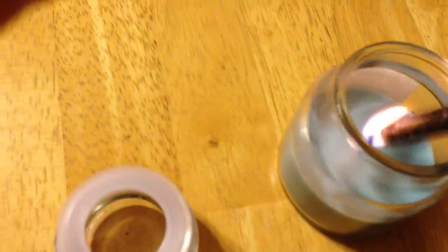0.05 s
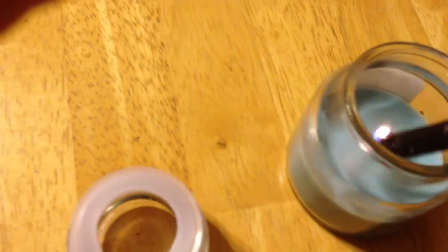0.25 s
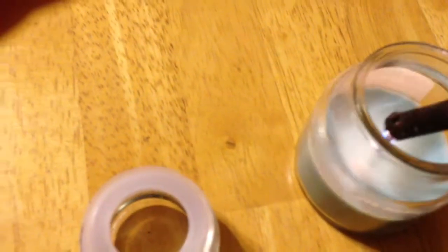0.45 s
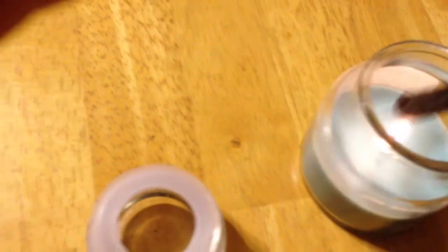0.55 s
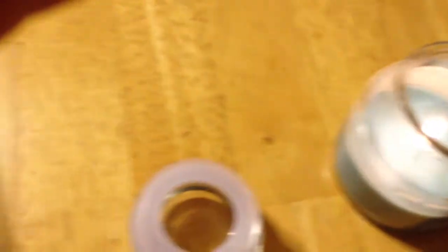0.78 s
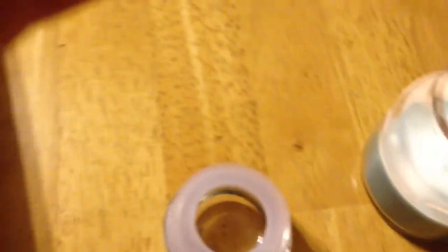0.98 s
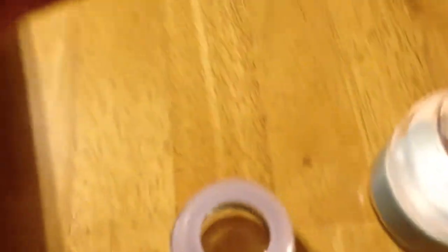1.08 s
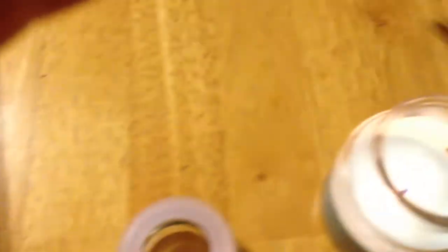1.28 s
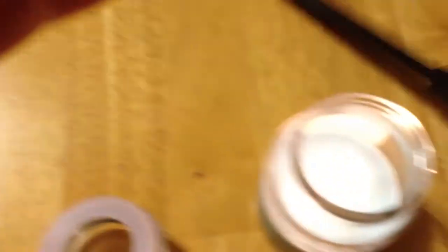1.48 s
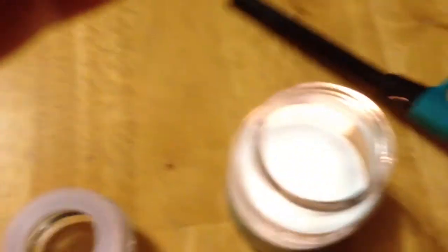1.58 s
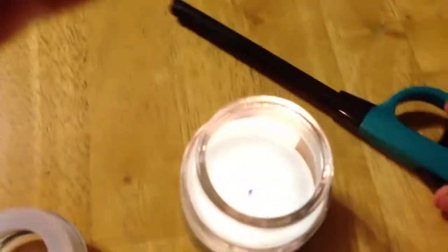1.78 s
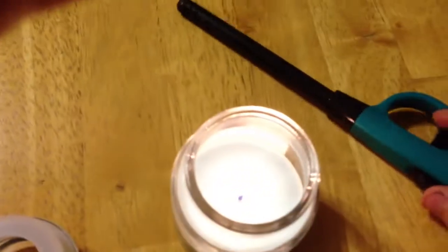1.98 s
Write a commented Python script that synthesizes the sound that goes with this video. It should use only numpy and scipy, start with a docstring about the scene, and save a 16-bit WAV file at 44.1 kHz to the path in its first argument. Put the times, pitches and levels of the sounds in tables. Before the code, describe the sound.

One sharp lighter click, followed by light plastic knocks on a wooden tabletop.

```python
"""Low room rumble and hiss, then a long-necked plastic lighter: its trigger slides, faint ticks swell,
and it snaps once. The released spring cracks and rings the mechanism; the small room reverberates.
The case creaks and rubs faintly in the hand, then is laid on a wooden table:
nozzle and case knock on the tabletop, which rings briefly."""
import sys
import numpy as np
from scipy import signal
from scipy.fft import rfft, irfft
from scipy.io import wavfile

SR = 44100
rng = np.random.default_rng(int(sys.argv[2]) if len(sys.argv) > 2 else 0)


def dump(signal):
    """Clip the signal to [-1, 1] and save it as 16-bit WAV at the path in sys.argv[1]."""
    limited = np.clip(np.atleast_2d(signal).T, -1, 1)
    pcm = np.round(limited * 32767).astype(np.int16)
    wavfile.write(sys.argv[1], SR, pcm)


N = 90404

# room rumble and hiss: (frequency [Hz], relative density [dB])
FLOOR_SPECTRUM = [(18, -62), (30, -32), (90, -24.5), (152, -5.5), (202, -1.5), (230, -3), (350, -2.5),
                  (379, -9.5), (443, -7.5), (492, -11.5), (591, -8.5), (673, -13), (874, -17), (1870, -16),
                  (6540, -20.5), (14000, -23.5), (15500, -23.5)]
# its slight waver: (time [s], level offset [dB])
FLOOR_WAVER = [(0, -0.5), (.35, 0.5), (.7, -1), (1.0, 1), (1.301, 1), (1.6, 0.5), (1.85, 1.5), (2.05, 1)]

# rows at 0.187-0.199 s: faint 2.2-2.3 kHz ticks swelling just before the snap;
# other rows: case creaks in the hand: (time [s], level [dB], pitch [Hz])
CREAKS_AND_TICKS = [(.094, -61, 2100), (0.102, -49.5, 2680), (.1870, -43, 2220), (0.1942, -34, 2336),
                    (0.1992, -24.5, 2237), (1.010, -57, 2890), (1.044, -62, 4040), (1.094, -45.5, 1720),
                    (1.11, -50, 1730), (1.144, -60, 1940), (1.190, -45.5, 2080), (1.197, -49.5, 1950)]
# trigger, fingers and case sliding: (centre time [s], half length [s], level [dB], band centre [Hz])
RUBS = [(0.094, 0.026, -65, 2640), (0.179, 0.032, -64, 2470), (0.744, 0.054, -73.5, 2640),
        (1.0, 0.054, -70, 1690), (1.133, 0.058, -65, 2020), (2.017, 0.065, -67, 595)]

# trigger snap and rebound: (time [s], ring level [dB], crack level [dB])
SNAPS = [(0.2021, -27.5, -20), (0.2022, -7.5, -17), (0.2055, -32, -23)]
# trigger mechanism: (frequency [Hz], level [dB], t60 [s])
TRIGGER_MODES = [(1020, -27, 0.021), (1383, -24, .026), (1565, -20.5, 0.03), (2123, -3, 0.01),
                 (2320, 0.5, .012), (2845, -12, 0.021), (3680, -6.5, .014), (4070, -14.5, 0.021),
                 (4480, -18, 0.025), (5620, -12.5, 0.011), (7640, -10, 0.0078), (9480, -13.5, 0.01),
                 (11400, -20, 0.0047)]
# snap crack, also grit of creaks and ticks: (frequency [Hz], relative density [dB])
CRACK_SPECTRUM = [(300, -43.5), (650, -31.5), (900, -13), (1400, -3), (3300, 0.5), (5000, -3), (6500, -5),
                  (8000, 2), (12000, -5.5), (14500, -3.5), (15500, -20)]
# reflections off near surfaces: (delay [s], gain [dB])
ECHOES = [(.0088, -21.5), (.029, -52.5), (.033, -31.5)]
# snap as radiated into the room: (frequency [Hz], gain [dB])
SNAP_SPREAD = [(150, -46.5), (800, -34), (1200, -10.5), (1600, -1), (2200, 4.5), (2900, 0), (3400, -2.5),
               (4300, -5), (6500, -6), (10000, -9.5), (14000, -13), (15500, -22.5)]

# reverb colour: (frequency [Hz], relative density [dB])
ROOM_SPECTRUM = [(120, 0.074), (350, 1), (1000, 0.8), (2200, -1), (5000, 1), (9000, -1.4), (15000, -2.05)]
# reverb decay: (frequency [Hz], t60 [s])
ROOM_T60 = [(120, 0.56), (1000, 0.25), (3000, .29), (8000, 0.2), (15000, 0.17)]

# lighter meets table: (time [s], case level [dB], case pitch [ratio], table high [dB],
# table middle [dB], table deep [dB], tick level [dB], contact cut-off [Hz])
KNOCKS = [(1.5360, -28.5, 0.99, -31, -32.5, -41.5, -27.5, 4230),
          (1.5385, -19.5, 1.03, -43, -50.5, -83, -37, 3500),
          (1.6710, -25, 1.0, -34.5, -39, -47.5, -30, 4200), (1.6800, -54, 1.0, -44.5, -50, -59, -42, 1510),
          (1.6892, -31, 1.02, -45, -46, -58, -56, 1000), (1.7301, -31.5, 1, -42, -61, -35.5, -32.5, 8000),
          (1.7369, -28.5, 1.04, -47.5, -61, -43.5, -37, 4600),
          (1.7453, -67, 1.0, -51, -53, -39.5, -65, 710), (1.7557, -57, 0.91, -54, -64, -38.5, -55, 700),
          (1.9759, -50.5, 0.94, -52.5, -60, -64, -68, 2000),
          (1.9783, -41, 1.05, -61, -66, -51.5, -64, 1400), (2.001, -72, 1.0, -74, -71, -56, -78, 700)]
# plastic case: (frequency [Hz], level [dB], t60 [s])
CASE_MODES = [(1162, -19, 0.032), (1380, -31, 0.063), (1670, -25, .02), (1814, 1, 0.022),
              (1940, -10, 0.036), (2380, -13.5, .014), (2710, -22.5, 0.033), (3500, -11.5, 0.013),
              (4180, -8.5, 0.006)]
# tabletop, three mode groups: (frequency [Hz], level [dB], t60 [s])
TABLE_HIGH_MODES = [(969, 0.5, 0.04), (1025, -6.5, 0.12), (1081.6, -4, .1), (1154, -16.5, 0.16),
                    (1151, -11, .16)]
TABLE_MIDDLE_MODES = [(638, -13.5, 0.16), (713, -4.5, 0.13), (797, -5, 0.062), (845, -15, 0.1)]
TABLE_DEEP_MODES = [(134, -13.5, 0.164), (170, -8, .22), (247, -3, 0.088), (348.3, -2.5, 0.18),
                    (414, -6.5, 0.11), (447, -5.5, 0.069)]
# hard-contact tick: (frequency [Hz], relative density [dB])
TICK_SPECTRUM = [(60, -38), (180, -1), (300, 5), (520, -1), (750, 0.5), (2000, 2.5), (3300, 1), (4300, 0.5),
                 (5200, -11.5), (6300, -5.5), (7500, -15.5), (10000, -11.5), (15500, -25)]


def from_db(db):
    """Decibels to gain."""
    return 10 ** (np.asarray(db) / 20)


def at_hz(points, hz):
    """Table lookup on a log-frequency axis."""
    knots_hz, values = np.transpose(points)
    return np.interp(np.log(np.maximum(hz, 1)), np.log(knots_hz), values)


def colour(x, spectrum):
    """Zero-phase spectral shaping."""
    return irfft(rfft(x) * from_db(at_hz(spectrum, np.fft.rfftfreq(N, 1 / SR))), N)


def butter(x, order, hz, kind):
    """Butterworth low-, high- or band-pass."""
    return signal.sosfilt(signal.butter(order, hz, kind, fs=SR, output="sos"), x)


def noise(spectrum):
    """Coloured noise, rms 1."""
    x = colour(rng.standard_normal(N), spectrum)
    return x / x.std()


def click(time_s, db):
    """One impulse."""
    x = np.zeros(N)
    x[int(time_s * SR)] = from_db(db)
    return x


def fade(start_s, t60_s):
    """Step onset, exponential decay."""
    age_s = np.arange(N) / SR - start_s
    return (age_s >= 0) * np.exp(-np.log(1000) * np.maximum(age_s, 0) / t60_s)


def ring(x, hz, t60_s):
    """Resonator: a unit impulse starts a decaying unit sine."""
    radius = np.exp(-np.log(1000) / (t60_s * SR))
    step_rad = 2 * np.pi * hz / SR
    return signal.lfilter([0, np.sin(step_rad)], [1, -2 * radius * np.cos(step_rad), radius ** 2],
                          x + 1e-18)


def body(x, modes, scatter_db=0.5):
    """Struck modes in alternating sign; levels scatter per strike."""
    return sum((-1) ** k * from_db(db + scatter_db * rng.standard_normal()) * ring(x, hz, t60_s)
               for k, (hz, db, t60_s) in enumerate(modes))


def noise_floor(level_db=-64):
    """Room rumble and hiss, wavering slightly."""
    waver_db = np.interp(np.arange(N) / SR, *np.transpose(FLOOR_WAVER))
    return from_db(level_db + waver_db) * noise(FLOOR_SPECTRUM)


def rubs(edge_ratio=1.25):
    """Sliding friction: soft swells of band noise."""
    time_s, out = np.arange(N) / SR, 0
    for centre_s, half_s, db, hz in RUBS:
        friction = butter(rng.standard_normal(N), 2, [hz / edge_ratio, hz * edge_ratio], "band")
        swell = np.exp(-((time_s - centre_s) / half_s) ** 2)
        out += from_db(db) * swell * friction / friction.std()
    return out


def creaks_and_ticks(t60_s=0.025, grit_db=-16, low_cut_hz=1200):
    """Case creaks, and the faint ticks before the snap: each a tiny pitched ring plus grit."""
    out = 0
    for time_s, db, hz in CREAKS_AND_TICKS:
        grit = from_db(db + grit_db) * fade(time_s, t60_s) * noise(CRACK_SPECTRUM)
        out += ring(click(time_s, db), hz, t60_s) + grit
    return butter(out, 4, low_cut_hz, "high")


def trigger_snap(crack_t60_s=0.0082, low_cut_hz=800):
    """The spring lets go: crack and short ring, from a part too small to radiate bass."""
    out = 0
    for time_s, ring_db, crack_db in SNAPS:
        out += body(click(time_s, ring_db), TRIGGER_MODES)
        out += from_db(crack_db) * fade(time_s, crack_t60_s) * noise(CRACK_SPECTRUM)
    return butter(out, 6, low_cut_hz, "high")


def room_reverb(x, onset_s=0.0043, build_s=0.008):
    """Diffuse tail: near-octave noise bands build fast and decay at their own rates."""
    edges_hz, tail = np.geomspace(100, 16000, 9), 0
    for low_hz, high_hz in zip(edges_hz, edges_hz[1:]):
        band = butter(noise(ROOM_SPECTRUM), 2, [low_hz, high_hz], "band")
        tail += band * fade(0, at_hz(ROOM_T60, np.sqrt(low_hz * high_hz)))
    tail *= np.clip((np.arange(N) / SR - onset_s) / build_s, 0, 1)
    return signal.fftconvolve(x, tail / np.sqrt(np.sum(tail ** 2)))[:N]


def near_echoes(x, high_cut_hz=3500):
    """Near surfaces return dull, delayed copies."""
    dull = butter(x, 1, high_cut_hz, "low")
    return sum(from_db(db) * np.pad(dull, (int(delay_s * SR), 0))[:N] for delay_s, db in ECHOES)


def table_knocks(tick_t60_s=0.02, low_cut_hz=105):
    """Each contact ticks and rings case and tabletop. Returns (case, table)."""
    out = 0
    for time_s, case_db, pitch_ratio, high_db, middle_db, deep_db, tick_db, contact_hz in KNOCKS:
        case_modes = [(hz * pitch_ratio, db, t60_s) for hz, db, t60_s in CASE_MODES]
        case = body(click(time_s, case_db), case_modes)
        # the spot struck sets the mode balance
        table = body(click(time_s, high_db), TABLE_HIGH_MODES)
        table += body(click(time_s, middle_db), TABLE_MIDDLE_MODES)
        table += body(click(time_s, deep_db), TABLE_DEEP_MODES)
        tick = from_db(tick_db) * fade(time_s, tick_t60_s) * noise(TICK_SPECTRUM)
        out += butter(np.array([case, table + tick]), 1, contact_hz, "low")  # softer contact, duller
    return butter(out, 1, low_cut_hz, "high")


def scene(snap_send_db=-7.5, small_send_db=-24, table_send_db=-15.5):
    """Close lighter and table, room reverb, noise floor. Mono."""
    case, table = table_knocks()
    small_sounds = case + creaks_and_ticks() + rubs()
    main_snap_s = SNAPS[1][0]
    send = colour(click(main_snap_s, snap_send_db), SNAP_SPREAD)
    send += from_db(small_send_db) * small_sounds + from_db(table_send_db) * table
    reverb = room_reverb(send)
    floor = noise_floor()
    snap = trigger_snap()
    return (snap + near_echoes(snap) + small_sounds + table + reverb + floor)[None]


def record(dry, low_cut_hz=90, high_cut_hz=15400):
    """Small microphone: no deep bass, steep top cut."""
    x = butter(dry, 2, low_cut_hz, "high")
    return signal.sosfilt(signal.ellip(10, .1, 80, high_cut_hz, fs=SR, output="sos"), x)


dry = scene()
out = record(dry)
dump(out)
```